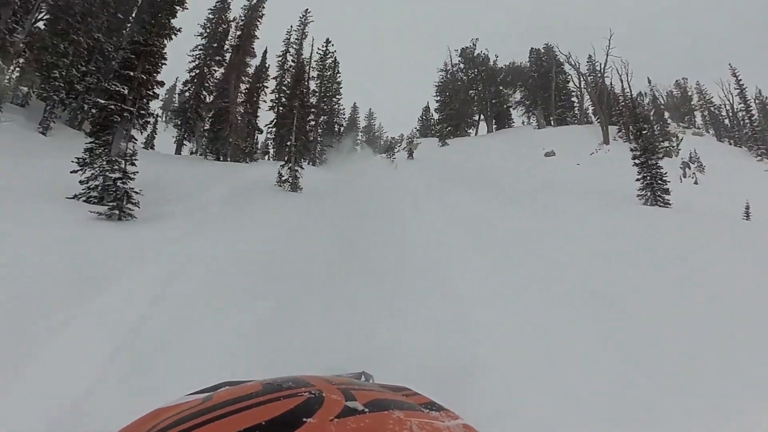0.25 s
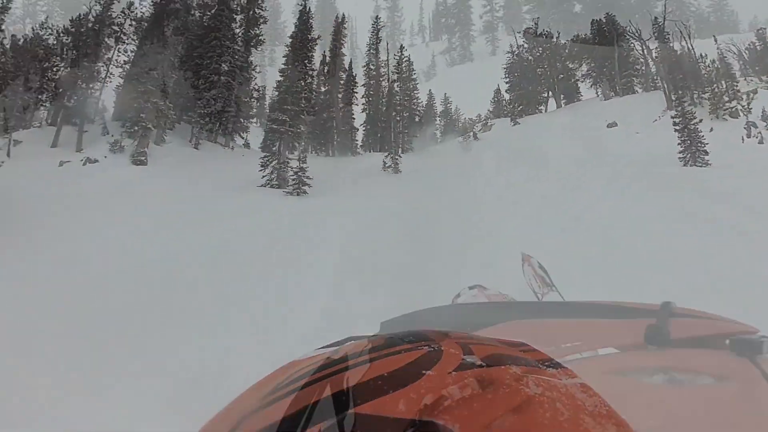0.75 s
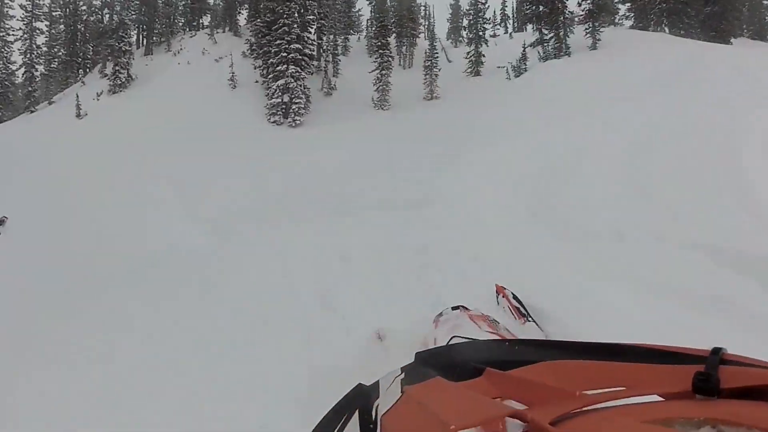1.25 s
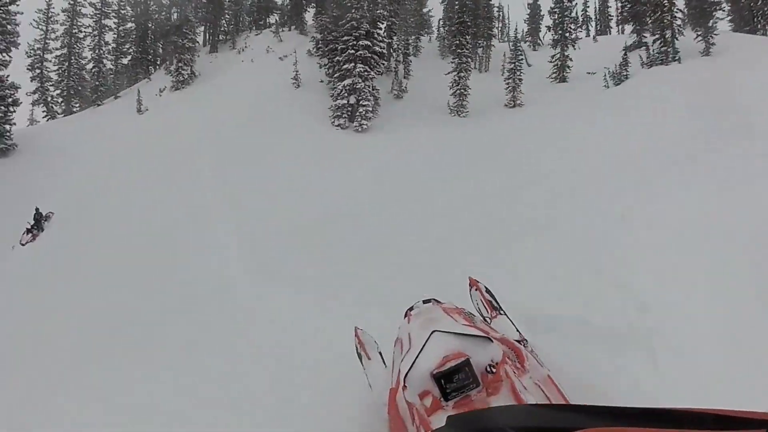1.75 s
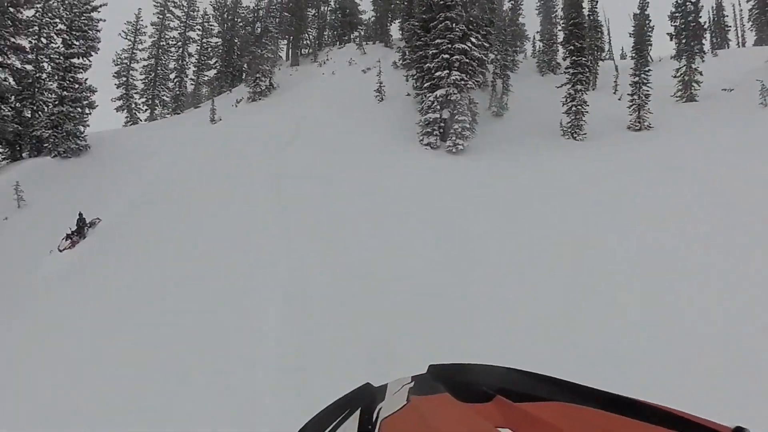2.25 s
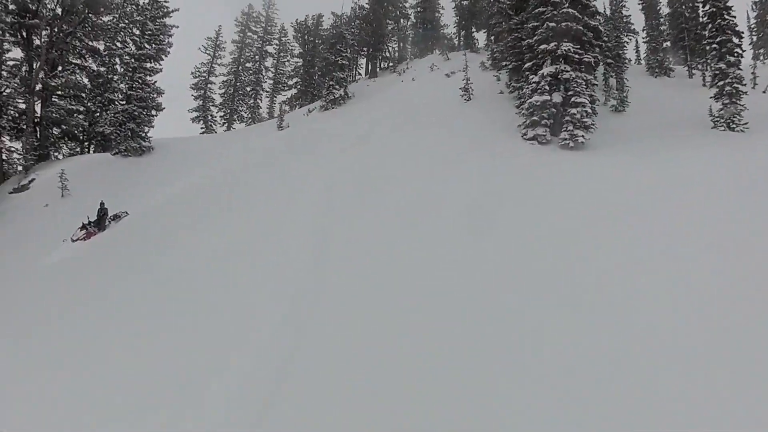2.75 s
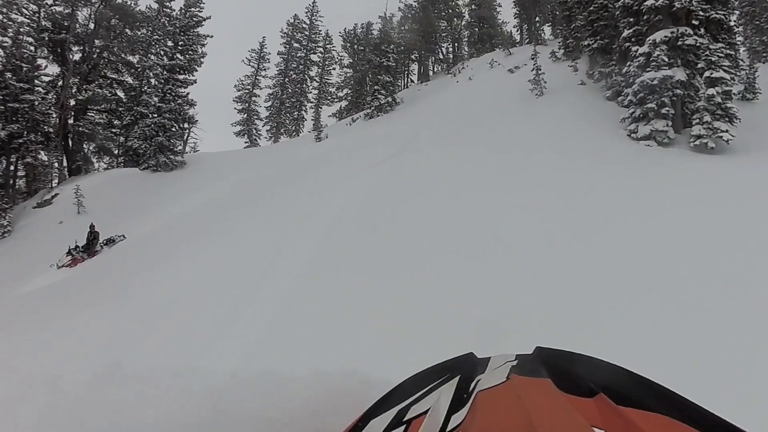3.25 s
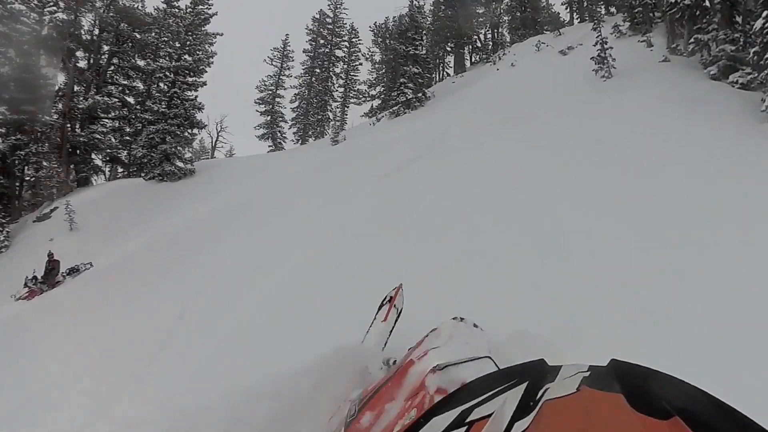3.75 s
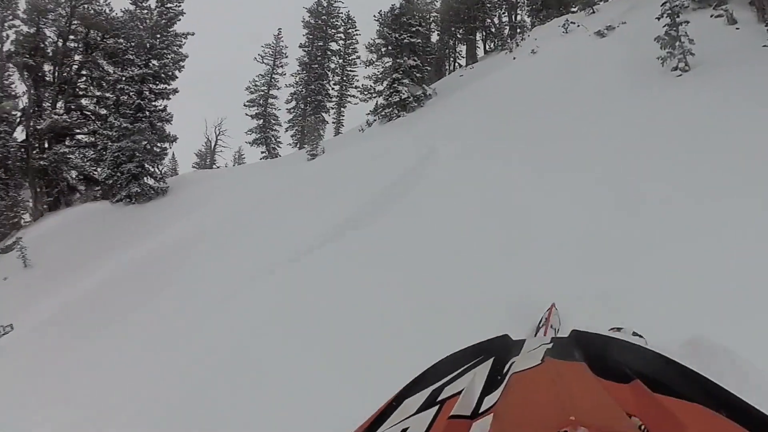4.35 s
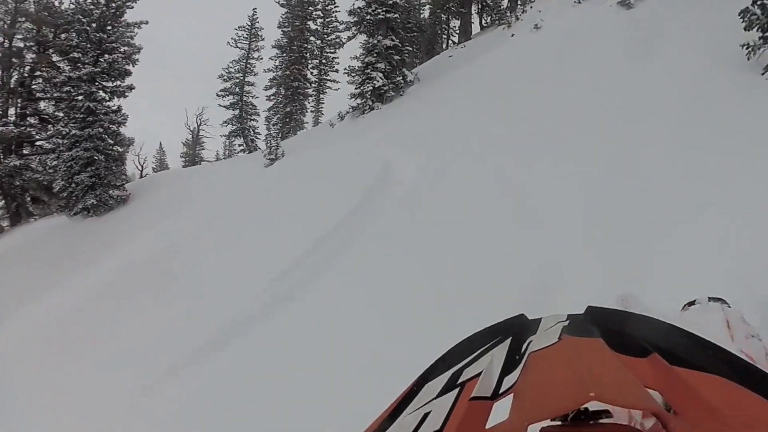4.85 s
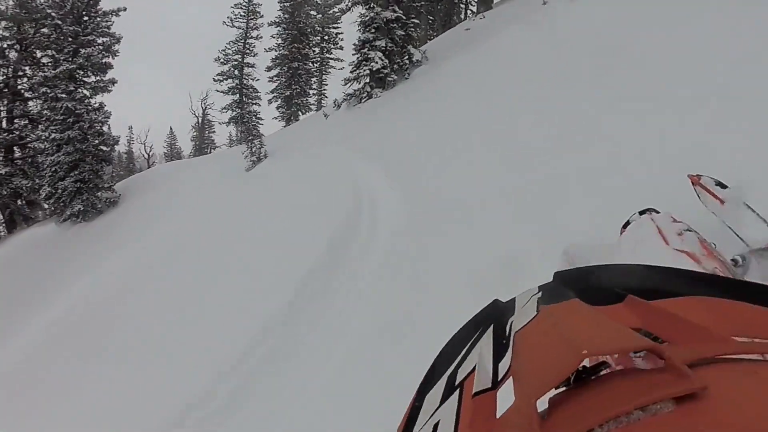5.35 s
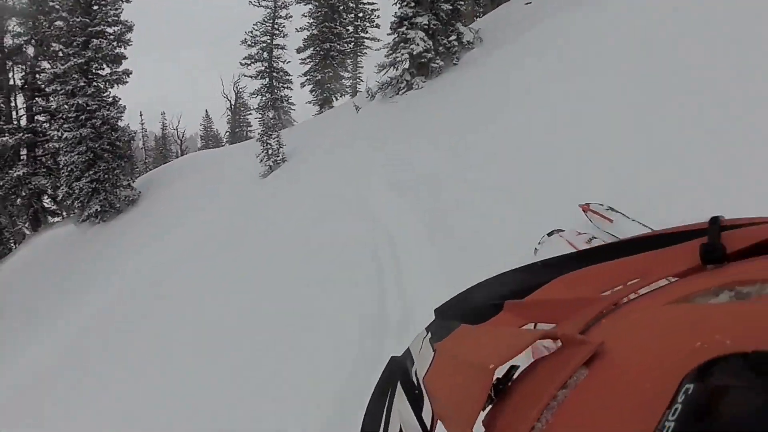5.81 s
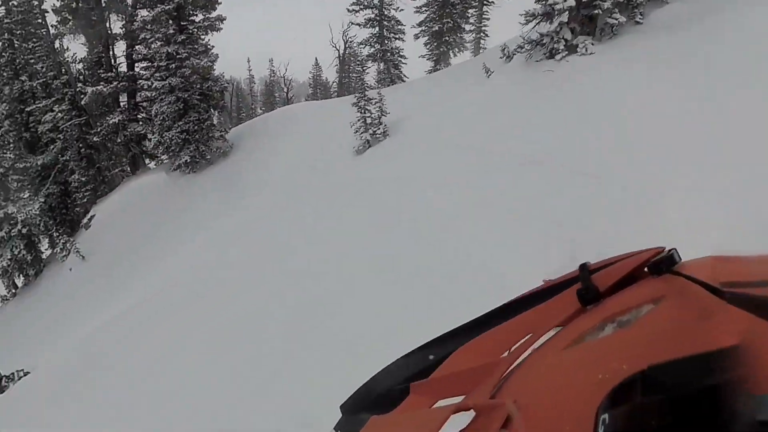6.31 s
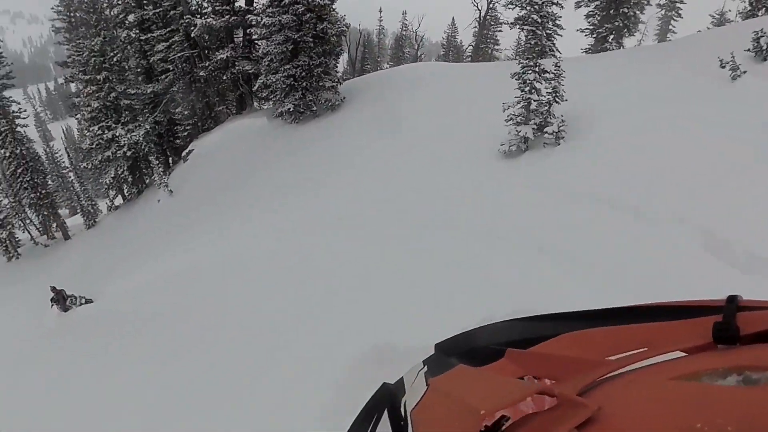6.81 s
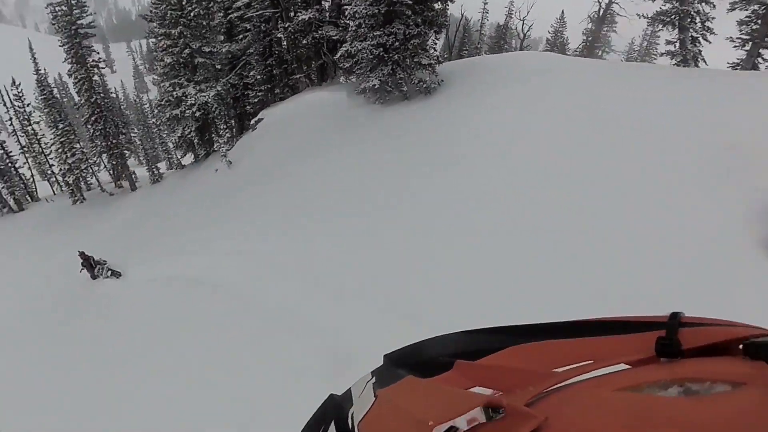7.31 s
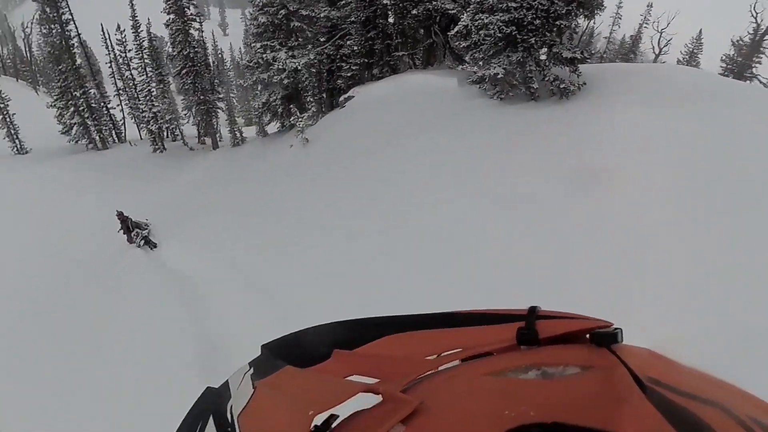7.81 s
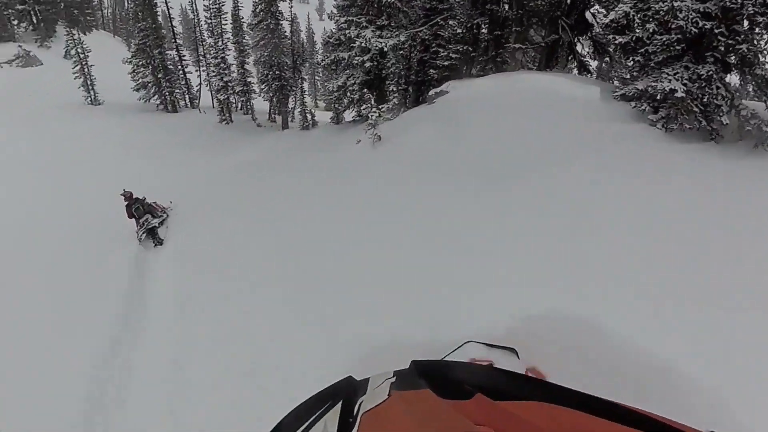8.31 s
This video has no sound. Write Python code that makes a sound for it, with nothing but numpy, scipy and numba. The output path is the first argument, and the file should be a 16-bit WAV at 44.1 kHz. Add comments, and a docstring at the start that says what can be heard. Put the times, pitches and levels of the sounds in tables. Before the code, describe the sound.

On an open snowy slope, a helmet microphone inside a case hears a two-stroke snowmobile close by. It hums low, then roars up and holds, followed by three more raspy surges and a weak last blip. Track whine follows the speed. Low wind rumble, churned snow and small plastic ticks run throughout. At the end the engine putters softly, with a distant sled's faint hum.

```python
"""A twin-cylinder two-stroke snowmobile is blipped up and down in deep powder, heard by a helmet camera in a case.
Crank-locked sines hum; crank multiples and gas noise ring pipe resonances, and gulps of air ring the intake.
Lug sines whine on the track's own speed; decaying modes tick in the case; filtered noise makes wind and snow.
A ragged high whistle glides and a second sled hums far off, both late and faint.
Two channels: a shared sound wanders between left and right, with faint separate wind, snow and hiss in each."""
import sys
import numpy as np
from scipy import signal
from scipy.fft import rfft, irfft, next_fast_len
from scipy.io import wavfile
from scipy.ndimage import uniform_filter1d
from numba import njit

SR = 44100
rng = np.random.default_rng(int(sys.argv[2]) if len(sys.argv) > 2 else 0)


def waveform_to_disk(signal):
    """Save audio, clipped to [-1, 1], as 16-bit WAV at the path in sys.argv[1]."""
    frames = np.transpose(np.atleast_2d(signal))
    scaled = np.clip(frames, -1, 1) * 32767
    samples = np.round(scaled).astype(np.int16)
    wavfile.write(sys.argv[1], SR, samples)


N = 377937

# Engine revs. Each row: time in seconds, crank rate in Hz, firing tone level in dB.
ENGINE_REVS = [(0.0, 78.6, -28), (0.28, 79.1, -30), (0.38, 76.32, -24), (0.62, 75.74, -32),
               (0.81, 80.14, -32), (1.0, 97.46, -40), (1.12, 110.7, -42), (1.19, 123, -31),
               (1.29, 136.1, -22.5), (1.36, 137.7, -20.5), (2.0, 137.6, -18.5), (2.1, 137.4, -26.5),
               (2.22, 117, -30), (2.34, 92.14, -33), (2.41, 99.7, -41), (2.58, 119.1, -31),
               (2.67, 122.5, -30), (2.81, 124.3, -31), (2.91, 122.1, -34.5), (3.01, 96.9, -39.5),
               (3.1, 89.8, -41.5), (3.2, 100.2, -39.5), (3.36, 119.9, -32.5), (3.55, 136.3, -27.5),
               (3.67, 139, -27), (3.98, 135.1, -26.5), (4.08, 132.1, -28.5), (4.18, 110, -37),
               (4.33, 90.33, -36.5), (4.44, 95.1, -34), (4.56, 110.5, -45), (4.7, 126.3, -31.5),
               (4.77, 133.4, -27), (4.88, 137.1, -24), (5.39, 132.7, -30), (5.66, 124, -35),
               (5.76, 103.2, -38), (5.86, 85, -41), (5.95, 73.94, -41), (6.06, 85.96, -31.5),
               (6.17, 97.4, -40.5), (6.3, 110.5, -36), (6.38, 100.6, -42), (6.47, 89, -37.5),
               (6.61, 76.74, -41), (6.74, 70, -37.5), (6.82, 69, -31.5), (6.93, 69.3, -48),
               (7.18, 76, -35.5), (7.35, 79, -41), (7.55, 77, -37), (7.73, 73.2, -42), (7.83, 75.1, -35),
               (7.95, 71.46, -48), (8.2, 68.9, -42), (8.57, 69.93, -44.5)]
# Throttle blips. Each row: opening and shutting time in seconds, octave level in dB while climbing,
# the same while holding, rasp level in dB.
THROTTLE_BLIPS = [(0.96, 2.1, -37.5, -37.5, -40), (2.359, 2.925, -40, -48, -38.5),
                  (3.11, 4.121, -43, -41.5, -40), (4.378, 5.666, -43, -49, -41.5),
                  (5.899, 6.296, -46.5, -45, -42)]
# Odd crank multiples from unlike cylinders. Each row: multiple, level in dB against the firing tone's octave.
ODD_MULTIPLES = [(3, -5), (5, -18.5)]
# Crank multiples with their own level in the stack, some weaker, some stronger.
# Each row: multiple, relative level in dB.
SET_MULTIPLES = [(6, -4.5), (8, -0.5), (10, -2.5), (14, -1.5), (18, -4), (28, 4.5), (30, 5.5)]
# Crank multiples that sing out for a while. Each row: start and end in seconds, multiple, level in dB.
SINGING_MULTIPLES = [(1.3, 2.05, 6, -53.5), (1.197, 1.83, 8, -45.5), (1.354, 1.61, 17, -44),
                     (1.5, 2.14, 18, -42), (1.63, 2.15, 14, -42.5), (1.65, 1.96, 10, -48),
                     (1.77, 2.15, 15, -47), (1.5, 1.9, 28, -50), (1.47, 2.1, 26, -51),
                     (1.35, 1.82, 30, -53), (2.4, 2.87, 8, -49.5), (2.67, 2.93, 6, -50.5),
                     (2.63, 2.9, 10, -45.5), (2.652, 2.87, 13, -42), (2.7, 2.93, 15, -43),
                     (2.5, 2.78, 20, -46), (2.74, 2.8, 18, -40.5), (3.47, 3.999, 13, -44.5),
                     (3.64, 4.1, 9, -46), (3.6, 4.1, 14, -48), (3.883, 4.1, 10, -48.5),
                     (3.549, 4.001, 17, -48), (3.7, 4.02, 16, -47.5), (3.78, 4.16, 18, -45.5),
                     (3.6, 4.1, 29, -51), (4.75, 5.4, 10, -47), (5.04, 5.6, 18, -45.5),
                     (5.051, 5.348, 15, -49.5), (5.14, 5.47, 14, -46.5), (5.35, 5.65, 7, -51.5),
                     (4.85, 5.3, 20, -53), (5.0, 5.6, 28, -52.5), (4.8, 5.65, 3, -47.5)]
# Pipe and cowl resonances that colour the rasp. Each row: centre in Hz, width in Hz, relative level in dB.
PIPE_RESONANCES = [(710, 540, -4), (1040, 99, 4.5), (1225, 200, 3), (1410, 116, 7.5), (1596, 86, 3),
                   (2084, 176, 2), (2415, 90, 9.5), (3010, 290, -12), (3810, 224, -4.5), (4650, 640, -19.5),
                   (5230, 400, -34), (6470, 170, -23)]
# Intake ringing as the engine pulls. Each row: time in seconds, level in dB.
INTAKE_LEVEL = [(0.0, -56), (0.95, -69), (1.02, -45), (1.1, -39.5), (1.17, -39), (1.22, -39), (1.28, -31.5),
                (1.33, -55.5), (2.1, -51), (2.35, -53), (2.47, -39), (2.6, -47), (2.7, -58), (2.85, -44),
                (2.95, -49.5), (3.05, -60), (3.2, -41.5), (3.3, -39), (3.38, -44), (3.5, -38.5), (3.6, -51),
                (4.05, -45.5), (4.2, -52.5), (4.38, -52), (4.47, -42), (4.6, -38.5), (4.68, -43),
                (4.77, -38.5), (4.85, -67), (5.65, -48.5), (5.85, -65), (6.1, -54), (6.2, -47), (6.35, -53),
                (8.57, -62)]
# Track speed. Each row: time in seconds, lug rate in Hz, lug tone level in dB.
TRACK_SPEED = [(1.1, 147.5, -40), (1.25, 178.5, -35), (1.4, 204.3, -44), (1.65, 212.8, -36),
               (1.9, 240.5, -38), (2.09, 253.3, -47), (2.2, 237.6, -34), (2.3, 224.2, -43),
               (2.36, 168.9, -33), (2.65, 208, -42), (2.85, 186.3, -29), (2.93, 165.4, -25.5),
               (3.0, 139.8, -26), (3.08, 135, -53), (3.57, 197, -38), (3.8, 217.4, -61), (4.0, 219.9, -42),
               (4.1, 213.5, -35), (4.27, 146, -33), (4.4, 135.1, -64), (4.75, 181.7, -36.5),
               (5.0, 210.3, -50), (5.3, 213.9, -45.5), (5.65, 202.6, -40), (5.83, 140.8, -39),
               (5.9, 133, -49)]
# Upper lug tones, tied to track speed. Each row: multiple, favoured lug rate in Hz, level there in dB,
# loss in dB per Hz away from it.
UPPER_LUG_TONES = [(2, 225, -42, 0.47), (3, 208, -53.5, 0), (6, 227, -41.5, 1)]
# Ticks on the case. Each row: time in seconds, peak level in dB of the low, middle, upper and high mode group
# before the final high-pass.
CASE_TICKS = [(0.0654, -37, -28.5, -36, -51), (0.1621, -39, -50, -43, -41), (0.1926, -49, -43, -56, -43),
              (0.3493, -49, -50, -36, -48), (0.4236, -49, -43, -39, -38), (0.4847, -20.5, -35, -38, -33),
              (0.4984, -26, -26, -38, -37), (0.5376, -47, -48, -33, -42), (0.6105, -47, -48, -49, -34),
              (0.708, -38, -28, -36, -35), (0.7217, -45, -39, -14.5, -31), (0.7304, -49, -41, -30, -44),
              (0.7641, -49, -33, -39, -33), (0.8598, -50, -32, -40, -35), (0.8699, -50, -37, -43, -54),
              (0.8875, -50, -42, -40, -43), (0.8998, -20, -41, -31, -38), (0.9323, -20, -29, -29, -37),
              (1.0027, -46, -55, -61, -45), (1.5573, -28, -34, -37, -31), (2.0758, -33, -47, -37, -29),
              (2.1519, -43, -50, -27, -30), (2.2667, -23, -42, -33, -28), (2.3198, -44, -31, -21, -38),
              (2.3846, -27, -30.5, -37, -39), (2.4952, -37, -33, -24.5, -38), (2.517, -40, -29, -42, -51),
              (2.5851, -18.5, -30, -18, -21.5), (2.6135, -28, -49, -41, -35),
              (2.6675, -39, -24.5, -34, -32), (2.7377, -22, -44, -35, -33), (2.7602, -36, -29, -36, -40),
              (2.7739, -35, -50, -41, -29), (2.8744, -27, -38, -28, -28), (2.9481, -30, -28, -29, -27),
              (3.0023, -14.5, -33, -25, -20), (3.0264, -47, -44, -33, -40), (3.0376, -28, -13, -29, -32),
              (3.0943, -32, -22, -32, -40), (3.1546, -44, -33, -44, -42), (3.4938, -28, -34, -41, -45),
              (3.6143, -16, -32, -37, -37), (3.8137, -35, -39, -32, -32), (3.9576, -38, -43, -40, -37),
              (3.9693, -23, -33, -33, -33), (4.1328, -18, -28, -32, -28), (4.2743, -48, -33, -44, -60),
              (4.3632, -40, -28, -29, -46), (4.4065, -43, -55, -30, -34), (4.69, -38, -37, -42, -41),
              (4.7514, -29, -34, -28, -37), (5.0685, -42, -49, -36, -52), (5.8498, -33, -38, -40, -58),
              (5.8806, -50, -42, -40, -50), (6.3103, -13, -30, -41, -38), (6.3282, -47, -46, -56, -39),
              (6.3634, -47, -53, -34, -37), (6.442, -42, -50, -44, -44), (6.5807, -19, -50, -37, -35),
              (6.6783, -49, -39, -49, -33), (6.7493, -49, -26.5, -35, -43), (6.8421, -32, -52, -28, -34),
              (6.8993, -34, -17, -17, -25), (6.968, -43, -52, -41, -33), (7.1546, -25, -15, -14.5, -23),
              (7.2462, -51, -30, -41, -41), (7.3539, -33, -36, -43, -40), (7.394, -40, -54, -26, -32),
              (7.4072, -43, -33, -38, -31), (7.4413, -18.5, -30, -37, -34), (7.4489, -37, -41, -45, -44),
              (7.4598, -41, -41, -49, -43), (7.5226, -48, -58, -59, -37), (7.7586, -55, -39, -61, -59),
              (8.1407, -20.5, -29, -33, -34), (8.147, -30, -42, -41, -47), (8.1604, -39, -41, -40, -39),
              (8.2797, -36, -41, -45, -53), (8.5349, -33, -23, -30, -31), (8.5425, -29, -25, -44, -24)]
# Case modes in a low, a middle, an upper and a high group. Each row of a group: nominal frequency in Hz,
# nominal relative level in dB, 60 dB decay time in seconds.
CASE_MODES = [
    [(800, -4, .002), (1500, -1, .0016), (2300, 0, .0016), (2400, -9, .014)],
    [(3300, -4, .005), (3900, 0, .008)],
    [(4500, 0, .004), (5200, -5, .003), (5960, -1, .004)],
    [(7980, -3, .004), (9200, -4, .003), (10500, 0, .004)],
]
# Air and snow. Each row: time in seconds, wind rumble, churned snow and fine hiss level, all in dB.
AIR_LEVELS = [(0.0, -36, -44, -62.5), (0.6, -33, -42, -60), (0.8, -36.5, -47.5, -61.5),
              (1.1, -38, -49, -55.5), (1.45, -36, -37.5, -54), (1.69, -35.5, -38.5, -53),
              (2.0, -37.5, -40, -54), (2.39, -34.5, -49, -51), (2.58, -36.5, -42.5, -51),
              (2.9, -33, -45.5, -55.5), (3.25, -34, -46, -51), (3.65, -35.5, -41.5, -53.5),
              (4.1, -36, -41, -55), (4.51, -37.5, -51, -53), (4.82, -33.5, -45, -54.5),
              (5.3, -40, -43, -55), (5.78, -35, -44, -54), (6.2, -39.5, -49, -53),
              (7.0, -35.5, -44.5, -52.5), (7.4, -39.5, -48.5, -51), (7.7, -40, -55, -54.5),
              (8.0, -39.5, -50, -50.5), (8.21, -39.5, -54, -53), (8.42, -38, -52, -54),
              (8.52, -38.5, -50.5, -54), (8.545, -39, -41.5, -51), (8.57, -39, -42, -51)]
# Wind rumble spectrum. Each row: frequency in Hz, relative density in dB per Hz.
RUMBLE_SPECTRUM = [(24, -83), (40, -61), (91, -25), (112, -23.5), (128, -8.5), (155, -5), (178, -9.5),
                   (203, -14), (285, -18.5), (413, -24.5), (462, -24.5), (581, -35), (729, -37.5),
                   (1200, -46), (1560, -83), (2640, -120)]
# Churned snow spectrum. Each row: frequency in Hz, relative density in dB per Hz.
SNOW_SPECTRUM = [(410, -0.5), (700, -0.5), (761, 1), (961, -11), (1190, -10.5), (1730, 0), (2030, -1.5),
                 (2310, 3.5), (2860, -6), (3120, 2.5), (3500, 0), (4400, -5), (4900, -12), (6500, -17.5),
                 (8450, -47), (14300, -120)]
# Fine hiss spectrum. Each row: frequency in Hz, relative density in dB per Hz.
HISS_SPECTRUM = [(2350, -39), (4000, -5), (5250, -3), (5670, -0.5), (7880, -2), (10300, 0), (12900, -4),
                 (15100, 1), (16000, -9)]
# A thin whistle that dips and climbs again. Each row: time in seconds, centre in Hz, level in dB.
WHISTLE_GLIDE = [(7.93, 15640, -85), (8.0, 14980, -68), (8.1, 13840, -60), (8.17, 12930, -59),
                 (8.3, 13770, -63), (8.42, 14890, -68), (8.5, 14430, -75), (8.57, 14830, -75)]
# Firing tone of a second sled across the slope. Each row: time in seconds, frequency in Hz, level in dB.
OTHER_SLED_HUM = [(7.85, 275, -67), (7.97, 282.3, -50), (8.15, 279.8, -50.5), (8.33, 271.7, -47.5),
                  (8.5, 266, -61)]
# Stereo balance. Each row: time in seconds, left minus right in dB.
BALANCE = [(0.0, -21.5), (0.48, -21.5), (0.62, -13.5), (0.74, -14), (0.86, -6), (0.95, -5.5), (1.1, 5.5),
           (1.79, 2), (2.22, 5.5), (3.03, 1.5), (3.96, 1), (4.1, -3), (4.7, -5), (5.01, -10), (5.17, -14),
           (5.32, -7), (6.35, -8), (6.75, 1.5), (6.97, 2.5), (7.11, 7), (7.45, 7), (7.57, 14.5), (7.73, 14),
           (8.1, 2), (8.5, 2.5), (8.57, 9)]

OPEN_S, SHUT_S = 0.129, 0.1615  # how fast the tone follows the throttle
SHUT_OCTAVE_DB, SHUT_RASP_DB = -60, -49  # with the throttle shut
CLIMB_HZ_PER_S = 45  # revs that climb this fast count as a full climb
FALL_OCTAVE_DB = -4  # the octave sinks while the revs drop
LOPE_DB, LOPE_RATE = 1.5, 32  # off throttle the firing stumbles; rate in Hz
PUTTER_DB, PUTTER_PER_TURN = 2, .36  # off throttle the firing also throbs, slower than the crank
TOP_REVS_HZ, RASP_DB_PER_HZ = 143, 0.2158  # the rasp grows with the revs
CLIMB_RASP_DB = 0.5  # added to the rasp in a full climb
SWELL_S = 0.1  # how fast a singing multiple comes and goes
BLUR_FROM, BLUR_TURNS = 21, .0005  # multiples above this one blur more, by turns for each multiple above
INTAKE_HZ, INTAKE_WIDTH_HZ = 1867., 290.
GULP_SHARPNESS, GULP_UNEVEN = 83, .35  # shortness of the intake gulps, difference of the cylinders
CRACK_HZ, CRACK_DB, CRACK_S = 3300, 7, 0.000098  # contact crack: pitch, gain, decay
CONTACT_S = 2e-4  # a blow takes a moment to land
EVEN_S, EVEN_SHARE = .07, .6  # time over which the rumble's strength is evened, and how far
TOP_HZ = 15750  # upper edge of the camera's band


def engine():
    """Periodic combustion: sines locked to the crank, plus a pipe and an intake as driven resonators."""
    hz, fire_db = curves(ENGINE_REVS)
    hz = uniform_filter1d(hz, int(.05 * SR))  # the flywheel rounds every change
    climb = uniform_filter1d(np.gradient(hz) * SR, int(0.054 * SR))  # Hz per s
    climbing = np.clip(climb / CLIMB_HZ_PER_S, 0, 1)
    shut = 1 - sum(opening())
    turns = np.cumsum(hz * (1 + .012 * shut * walk(LOPE_RATE))) / SR

    # combustion scatter shakes the crank angle, most while the revs change
    scatter = .004 + .005 * np.clip(np.abs(climb) / 100, 0, 1)
    shaken = turns + scatter * walk(120) + .009 * walk(15)

    # the stack needs revs; falling revs mean a shut throttle
    load = np.clip((hz - 72) / 32, 0, 1) * np.clip(1.15 + climb / 200, 0, 1)

    _, _, _, _, blip_rasp_db = np.transpose(THROTTLE_BLIPS)
    lack_hz = (1 - shut) * (hz - TOP_REVS_HZ)
    rasp_db = throttle(blip_rasp_db, SHUT_RASP_DB) + RASP_DB_PER_HZ * lack_hz
    rasp_db = rasp_db + CLIMB_RASP_DB * climbing + 1.07 * walk(LOPE_RATE)
    ring_db = curves(INTAKE_LEVEL)[0] + 1.7 * walk(40)  # it flutters

    swells = singing_swells()
    low = firing_tones(turns, fire_db, climb, climbing, shut)
    singing = sum(swell * tone(k * shaken, db, 2.36, rate=12) for k, db, swell in swells)
    gas = np.exp(-(2 * turns % 1) / 3.5) * rng.standard_normal(N)  # two puffs a turn
    rasp = pipe_rasp(load * level(crank_stack(shaken, swells)), gas)
    return low + singing + undb(rasp_db) * rasp + undb(ring_db) * intake_ring(turns, shaken, gas)


def firing_tones(turns, fire_db, climb, climbing, shut):
    """Two firings a turn give a tone at twice the crank rate, its octave, and odd multiples by asymmetry."""
    _, _, rise_db, hold_db, _ = np.transpose(THROTTLE_BLIPS)
    octave_db = climbing * throttle(rise_db, SHUT_OCTAVE_DB) + (1 - climbing) * throttle(hold_db, SHUT_OCTAVE_DB)
    octave_db = octave_db + FALL_OCTAVE_DB * np.clip(-climb / 100, 0, 1)
    octave_db = octave_db + LOPE_DB * (0.32 + shut) * walk(LOPE_RATE)
    putter_db = PUTTER_DB * np.sin(2 * np.pi * PUTTER_PER_TURN * turns)
    fire_db = fire_db + shut * (LOPE_DB * walk(LOPE_RATE) + putter_db)
    odd = sum(tone(k * turns, octave_db + db, 2.2) for k, db in ODD_MULTIPLES)
    return tone(2 * turns, fire_db, 1.0) + tone(4 * turns, octave_db, 1.5) + odd


def singing_swells():
    """Amplitude envelopes of selected harmonics: multiple, level in dB, and strength 0-1 over time."""
    s = np.arange(N) / SR
    return [(k, db, np.clip(np.minimum(s - start, end - s) / SWELL_S + .5, 0, 1))
            for start, end, k, db in SINGING_MULTIPLES]


def crank_stack(shaken, swells):
    """Harmonic series with phase jitter: crank multiples that waver, the higher ones blurred most."""
    set_db = dict(SET_MULTIPLES)
    blur = BLUR_TURNS * walk(250)
    stack = np.zeros(N)
    for k in range(6, 42):
        # a singing multiple leaves the stack meanwhile
        rest = 1 - sum(swell for j, _, swell in swells if j == k)
        # the cylinders differ, so odd multiples sound too, by default a little weaker
        db = set_db.get(k, -3 * (k % 2))
        angle = shaken + max(k - BLUR_FROM, 0) * blur
        stack += rest * tone(k * angle, db, 3.0, rate=15)
    return stack


def pipe_rasp(stack, gas):
    """Forced resonance: the stack and puffs of gas noise drive parallel pipe and cowl band-passes."""
    drive = stack + level(gas, -3)
    pipe = np.zeros(N)
    for i, (hz, width, db) in enumerate(PIPE_RESONANCES):
        pipe += (-1) ** i * undb(db) * svf(drive, float(hz), float(width))  # signs alternate
    return level(pipe)


def intake_ring(turns, shaken, gas):
    """Resonant excitation: two short gulps a turn light up single multiples that climb through the intake's pitch."""
    gulps = np.exp(GULP_SHARPNESS * (np.cos(4 * np.pi * shaken) - 1))
    gulps = gulps * (1 + GULP_UNEVEN * np.sin(2 * np.pi * turns + 1.0))
    ring = svf(level(gulps) + level(gas, -1.0), INTAKE_HZ, INTAKE_WIDTH_HZ)
    return level(svf(ring, INTAKE_HZ, INTAKE_WIDTH_HZ))


def throttle(blip_levels, shut_db):
    """Envelope interpolation: a level in dB rises from its shut value to each blip's own and falls back."""
    return shut_db + sum(o * (db - shut_db) for o, db in zip(opening(), blip_levels))


def opening():
    """Linear ramps: how far the throttle is open in each blip, 0-1."""
    s = np.arange(N) / SR
    return [np.clip((s - start) / OPEN_S, 0, 1) * np.clip(1 - (s - end) / SHUT_S, 0, 1)
            for start, end, *_ in THROTTLE_BLIPS]


def track():
    """Periodic impact: drive lugs beat the sprockets, giving a tone and multiples; the highest need open throttle."""
    hz, db = curves(TRACK_SPEED)
    s = np.arange(N) / SR
    start, end = TRACK_SPEED[0][0], TRACK_SPEED[-1][0]
    running = np.interp(s, [start - .1, start, end, end + .1], [0, 1, 1, 0])
    turns = np.cumsum(hz) / SR
    octave, *top = [tone(k * turns, best_db - slope * np.abs(hz - best_hz), 1.5, rate=11)
                    for k, best_hz, best_db, slope in UPPER_LUG_TONES]
    return running * (tone(turns, db, 1.3) + octave + sum(opening()) ** 2 * sum(top))


def faint_ticks():
    """Random impacts, 60 a second: small bright blows whose strength rises and falls in flurries."""
    chance = rng.random((int(60 * N / SR), 6))
    flurry_db = 3 * walk(5)[(chance[:, 0] * N).astype(int)]
    strength_db = -46 - 3.0 * np.log(chance[:, 1] + 1e-3) + flurry_db
    group_db = strength_db[:, None] + [-20, -8, -2, 0] - 12 * chance[:, 2:]
    return np.column_stack([chance[:, 0] * (N / SR - .05), group_db])


def ticks():
    """Modal synthesis: blows on the case ring its four mode groups by different shares."""
    s = np.arange(int(0.02 * SR)) / SR
    landing = 1 - np.exp(-s / CONTACT_S)
    crack = np.sin(2 * np.pi * CRACK_HZ * s) * np.exp(-s / CRACK_S) * landing
    crack = crack / np.abs(crack).max()
    out = np.zeros(N + len(s))
    for at, *group_db in np.vstack([CASE_TICKS, faint_ticks()]):
        # the contact itself cracks broadly, most in the full-bodied blows
        blow = undb(CRACK_DB + .75 * group_db[0] + 0.33 * group_db[1]) * crack
        for modes, db in zip(CASE_MODES, group_db):
            hz, mode_db, t60 = np.transpose(modes)[:, :, None]
            # the place of the blow shifts and weights the modes
            place = rng.standard_normal((2, len(modes), 1))
            mode_db = mode_db + 2.5 * place[0]
            hz = hz * (1 + .025 * place[1])
            decay = np.exp(-np.log(1000) * s / t60)
            ring = landing * np.sum(undb(mode_db) * np.sin(2 * np.pi * hz * s) * decay, axis=0)
            blow = blow + undb(db) * ring / np.abs(ring).max()
        first = int(at * SR)
        out[first:first + len(s)] += blow
    # the small case holds no bass
    return signal.sosfilt(signal.butter(2, 400, "high", fs=SR, output="sos"), out[:N])


def air():
    """Turbulence and friction as shaped noise: wind buffets the case, the track churns snow, spray and wind hiss."""
    rumble_db, snow_db, hiss_db = curves(AIR_LEVELS)
    rumble = coloured(RUMBLE_SPECTRUM, flicker_db=1.75, rate=28, bands=[250, 500])
    power = uniform_filter1d(rumble ** 2, int(EVEN_S * SR))
    rumble = level(rumble / power ** (EVEN_SHARE / 2))
    snow = coloured(SNOW_SPECTRUM, flicker_db=1.57, rate=30, bands=[1500, 2800])
    hiss = coloured(HISS_SPECTRUM, flicker_db=.3, rate=15, bands=[7000, 11000])
    gust = undb(1.4 * walk(35))  # gusts of spray sway the whole hiss
    return undb(rumble_db) * rumble + undb(snow_db) * snow + gust * undb(hiss_db) * hiss


def whistle():
    """Random frequency modulation spreads a gliding sine, ragged in pitch and strength, into a narrow noise band."""
    hz, db = curves(WHISTLE_GLIDE)
    return tone(np.cumsum(hz + 320 * walk(400)) / SR, db, 5.0, rate=150)


def other_sled():
    """Amplitude fluctuation: a faint wavering hum from far off, a single sine."""
    hz, db = curves(OTHER_SLED_HUM)
    return tone(np.cumsum(hz) / SR, db, 1.5, rate=25)


def undb(db):
    """Decibel law: amplitude ratio of a level in dB."""
    return 10 ** (np.asarray(db) / 20)


def level(x, db=0):
    """Root-mean-square normalisation: scale a signal to a given rms level in dB."""
    return x * undb(db) / np.sqrt(np.mean(x ** 2))


def curves(table):
    """Linear interpolation: columns of a table joined by straight lines, one value a sample."""
    s, *columns = np.transpose(table)
    return [np.interp(np.arange(N) / SR, s, c) for c in columns]


@njit
def svf(x, hz, width):
    """Second-order resonance: a state-variable band-pass, gain 1 at the centre."""
    y, band, low = np.empty(len(x)), 0., 0.
    g, k = np.tan(np.pi * hz / SR), width / hz
    for i in range(len(x)):
        v = (band + g * (x[i] + 1e-18 - low)) / (1 + g * (g + k))
        band, low, y[i] = 2 * v - band, low + 2 * g * v, k * v
    return y


def walk(rate):
    """Smoothed random process: levels held 1 / rate s and slewed twice; spread near 1."""
    k = int(SR / rate)
    steps = np.repeat(rng.standard_normal(N // k + 1), k)
    return 1.3 * uniform_filter1d(uniform_filter1d(steps, k), k)[:N]


def tone(turns, db, waver_db, rate=20):
    """Phase accumulation: a sine of given rms level follows a count of turns and wavers in strength."""
    strength = np.sqrt(2) * undb(db + waver_db * walk(rate))
    return strength * np.sin(2 * np.pi * (turns + rng.random()))


def coloured(spectrum, flicker_db, rate, bands):
    """Spectral shaping: noise of a given spectrum, cut into bands that flicker each on their own."""
    size = next_fast_len(N)
    hz = np.arange(1, size // 2 + 2) * SR / size
    points = np.array(spectrum)
    shape_db = np.interp(np.log(hz), np.log(points[:, 0]), points[:, 1], -99, -99)
    bins = rfft(rng.standard_normal(size)) * undb(shape_db)
    edges = [0, *bands, SR]
    out = np.zeros(N)
    for bottom, top in zip(edges, edges[1:]):
        band = irfft(bins * (hz >= bottom) * (hz < top), size)[:N]
        out += undb(flicker_db * walk(rate)) * band
    return level(out)


def scene():
    """Superposition: all sources add to one sound, balanced between two channels with some noise of their own."""
    mono = engine() + track() + ticks() + air() + whistle() + other_sled()
    ratio = undb(curves(BALANCE)[0] + 0.15 * walk(40))  # the balance also trembles
    # each channel's electronics add a faint hiss of their own
    own = undb(-67) * rng.standard_normal((2, N))
    # and wind and snow reach each side a little on their own
    wind = [coloured(RUMBLE_SPECTRUM, flicker_db=4.0, rate=9, bands=[110]) for _ in range(2)]
    snow = [coloured(SNOW_SPECTRUM, flicker_db=-0.5, rate=29, bands=[2000]) for _ in range(2)]
    own = own + undb(-54.5) * np.array(wind) + undb(-66.0) * np.array(snow)
    return mono * np.array([2 * ratio, 2 + 0 * ratio]) / (1 + ratio) + own


def record(dry):
    """Band limitation: the camera cuts the deep bass gently and the top steeply."""
    dry = signal.sosfilt(signal.butter(2, 45, "high", fs=SR, output="sos"), dry)
    return signal.sosfilt(signal.ellip(10, .2, 70, TOP_HZ, fs=SR, output="sos"), dry)


dry = scene()
out = record(dry)
waveform_to_disk(out)
```